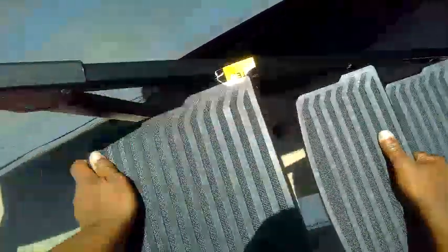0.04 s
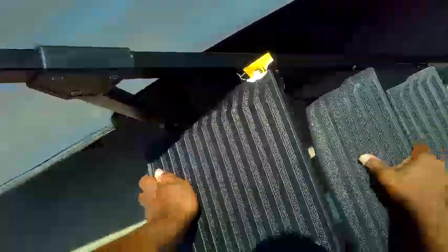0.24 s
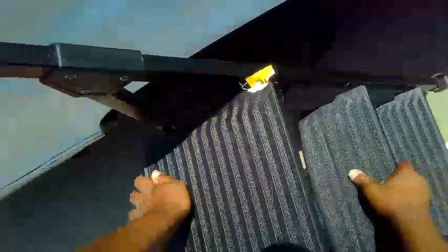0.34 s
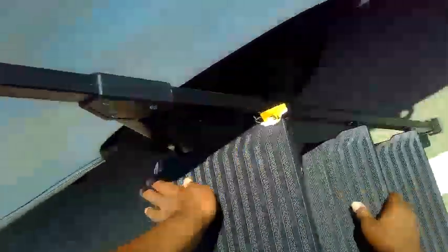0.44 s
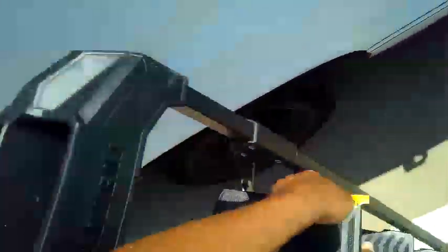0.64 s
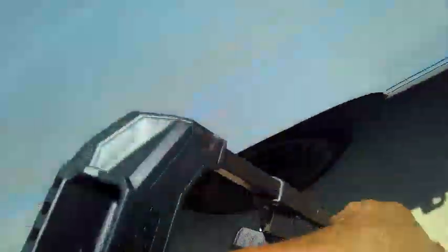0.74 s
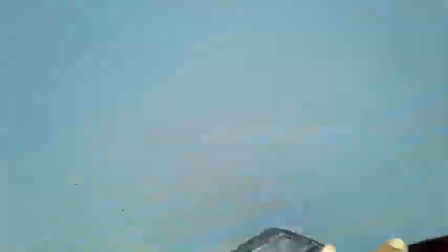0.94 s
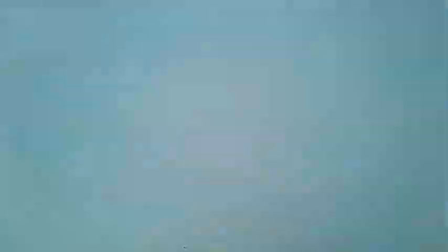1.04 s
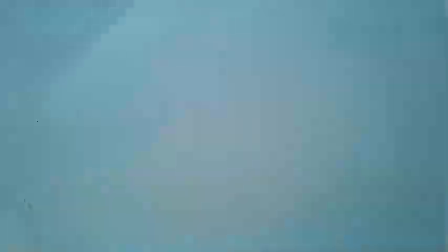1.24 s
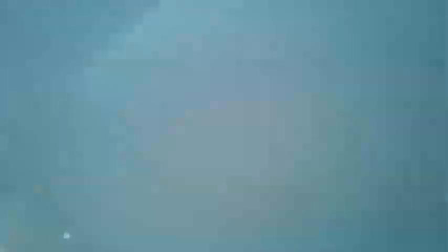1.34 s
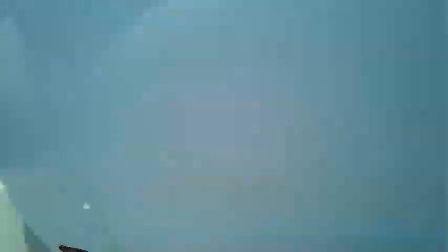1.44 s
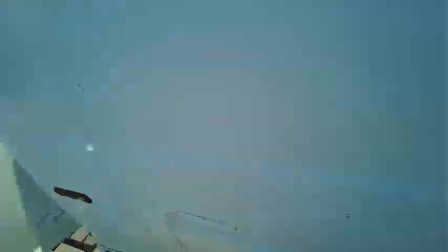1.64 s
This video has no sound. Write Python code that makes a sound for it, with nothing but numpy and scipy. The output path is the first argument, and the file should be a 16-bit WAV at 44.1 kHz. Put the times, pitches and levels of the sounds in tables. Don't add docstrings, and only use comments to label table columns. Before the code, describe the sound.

A metal step ladder snaps open with a loud steel clack, then its feet thud down outdoors

```python
import sys
import numpy as np
from scipy import signal
from scipy.fft import rfft, irfft
from scipy.io import wavfile
from scipy.ndimage import uniform_filter1d, map_coordinates

SR = 44100
rng = np.random.default_rng(int(sys.argv[2]) if len(sys.argv) > 2 else 0)


def volts(x):
    e = np.asarray(x, float) / 20
    return 10 ** e


def output_pcm(signal):
    pcm = np.clip(np.atleast_2d(signal).T, -1, 1) * 32767
    wavfile.write(sys.argv[1], SR, np.round(pcm).astype(np.int16))


N = 74970


def unit(x):
    return x / np.sqrt(np.mean(x ** 2) + 1e-20)


def along(points, hz):
    f, v = np.transpose(points)
    return np.interp(np.log(hz + 1), np.log(f + 1), v)


def curves(rows):
    s, *columns = np.transpose(rows)
    return [np.interp(np.arange(N) / SR, s, column) for column in columns]


def wobble(rate_hz):
    knots = rng.standard_normal(int(N * rate_hz / SR) + 4)
    return map_coordinates(knots, [np.arange(N) * rate_hz / SR])


def spread(pair, alike, hz):
    turn = np.arccos(np.clip(along(alike, hz), -1, 1)) / 2
    mid, side = pair[0] * np.cos(turn), pair[1] * np.sin(turn)
    return np.array([mid + side, mid - side])


def rush(size, spectrum, alike, decay=((1, 1e6),), patchy_db=0.):
    hz, t, z = signal.stft(rng.standard_normal((2, size)), SR, nperseg=256)
    hz = hz[:, None]
    field = uniform_filter1d(rng.standard_normal(z.shape[1:]), size=4, axis=0)
    field = unit(uniform_filter1d(field, size=10, axis=1))
    gain_db = along(spectrum, hz) + patchy_db * field - 60 * t / along(decay, hz)
    z = spread(z, alike, hz) * volts(gain_db)
    return signal.istft(z, SR, nperseg=256)[1][:, :size]


# hz, likeness
NEAR_ALIKE = [(100, 0.79), (500, 1), (1500, 0.12), (4000, .1), (12000, 0.29)]
CONTACT_SPREAD_DB, REBOUND_DB, CHATTER_PER_S = 3, -14, 580


def strikes(rows, modes, colour, decay, noise_db, attack_s, focus_db):
    out, t = np.zeros((2, N + SR)), np.arange(SR // 3) / SR
    for start_s, peak_db, focus_hz, chatter_s in rows:
        def focus(f):
            return -focus_db * np.abs(np.log2(f / focus_hz))

        hz, level_db, t60_s = np.transpose(modes)[:, :, None]
        turn = np.arccos(np.clip(along(NEAR_ALIKE, hz), -1, 1)) * rng.uniform(-1, 1, hz.shape)
        level_db = level_db + focus(hz) + rng.normal(0, 1.5, hz.shape)
        decaying = volts(level_db - 60 * t / t60_s)
        ring = np.array([np.sum(decaying * np.sin(2 * np.pi * hz * t + side * turn), axis=0)
                         for side in (.5, -.5)])

        gap_draw, size_draw = rng.standard_normal((2, 24))
        when_s = np.append(0, np.cumsum(np.exp(.5 * gap_draw) / CHATTER_PER_S))[:-1]
        size = volts((REBOUND_DB + CONTACT_SPREAD_DB * size_draw) * (when_s > 0))
        size = size * np.clip(1 - when_s / chatter_s, 0, 1)
        contacts = np.bincount((when_s * SR).astype(int), size)
        ring = signal.fftconvolve(ring, contacts[None], axes=1)[:, :len(t)]

        focused_colour = [(f, v + .5 * focus(f)) for f, v in colour]
        cloud = rush(len(t), focused_colour, NEAR_ALIKE, decay)
        hit = ring / np.abs(ring).max() + volts(noise_db) * cloud / np.abs(cloud).max()
        out[:, round(start_s * SR):][:, :len(t)] += volts(peak_db) * hit * (1 - np.exp(-t / attack_s))
    return out[:, :N]


# start_s, peak_db, loudest_hz, chatter_s
SNAPS = [
    (0.2454, 8, 900, 0.0017),
    (.2480, 11.5, 1106, 0.0021),
    (.2505, 11.5, 1514, 0.0027),
    (0.2545, 1.5, 2200, 0.0049),
    (.2575, -0.5, 600, 0.0066),
    (.2645, -7.5, 352, 0.0036),
    (.274, -10.5, 1100, 0.013),
    (.284, -23, 1094, 0.0035),
]
# hz, level_db, t60_s
SNAP_MODES = [(225, -5, 0.06), (345, -4, .07), (483, -5, 0.05), (760, -1, .02), (1080, 5, 0.035),
              (1290, 0, .025), (1500, 2, .025), (1790, -2, 0.025), (2200, -1, .03), (2900, -5, 0.02),
              (3700, -10, .02)]
# hz, level_db_per_hz
SNAP_COLOUR = [(35, -47), (60, -5), (752, 3), (948, -6), (1060, -3), (1370, -11.5), (1510, 1),
               (6650, -27.5), (15300, -35.5)]
# hz, t60_s
SNAP_DECAY = [(100, .08), (500, 0.012), (1500, .03), (6000, 0.082), (14000, 0.14)]


def lock_snaps():
    return strikes(SNAPS, SNAP_MODES, SNAP_COLOUR, SNAP_DECAY, noise_db=-4, attack_s=.00015, focus_db=3)


# start_s, peak_db, loudest_hz, chatter_s
CATCH = [
    (0.2056, 6, 864, 0.0043),
    (.2075, 2, 1300, 0.0089),
    (.2100, 0.5, 1840, .002),
    (.2130, 2.5, 2600, 0.0034),
    (.2163, -2, 400, 0.00098),
    (.2255, -17.5, 350, .004),
]
# hz, level_db, t60_s
CATCH_MODES = [(350, -1, .05), (510, -2, .03), (790, 1, .022), (1050, -2, .02), (1300, 3, .02),
               (1760, 3, .017), (2120, -3, .02), (2680, -4, .017), (3400, -10, .013)]
# hz, level_db_per_hz
CATCH_COLOUR = [(35, -42.5), (70, -10.5), (700, -2), (1800, -7), (4000, -19), (5500, -29.5), (10000, -24),
                (15300, -37.5)]
# hz, t60_s
CATCH_DECAY = [(100, .05), (1500, .022), (6000, .028), (14000, .016)]


def hinge_catch():
    return strikes(CATCH, CATCH_MODES, CATCH_COLOUR, CATCH_DECAY, noise_db=-5, attack_s=.0002, focus_db=4)


# hz, t60_s
FRAME_DECAY = [(200, 0.13), (2000, 0.14), (10000, 0.095)]
FRAME_DB, RATTLE_PER_S = -7, 500


def frame(x):
    tail = rush(SR // 4, [(100, -9), (1000, -9.5), (10000, 0.5)], NEAR_ALIKE, FRAME_DECAY)
    tail = tail / np.linalg.norm(tail[0])
    return volts(FRAME_DB) * signal.fftconvolve(x * wobble(RATTLE_PER_S), tail, axes=1)[:, :N]


# hz, level_db, t60_s
TUBE = [(1957, -36, .36), (6920, -25, .07), (7900, -26, .07), (10700, -28, .05)]


def tube():
    t = np.clip(np.arange(N) / SR - SNAPS[0][0], 0, None)
    return sum(volts(level_db - 60 * t / t60_s) * np.sin(2 * np.pi * hz * t + .15 * wobble(20) * (t > 0))
               for hz, level_db, t60_s in TUBE)


# start_s, peak_db, loudest_hz, chatter_s
THUDS = [(.6548, -23.5, 320, 0.0014), (.6565, -31.5, 1280, 0.0022), (.7105, -11, 907, 0.0037),
         (.715, -8, 614, 0.0083), (.7195, -10.5, 704, 0.0033), (.7243, -12.5, 609, 0.0062),
         (.7335, -7, 480, .004), (.7395, -11.5, 540, .003), (.7445, -8.5, 502, .003),
         (.7535, -16, 406, 0.0025), (.762, -21.5, 472, 0.0054), (.7975, -25, 1280, 0.0035),
         (.808, -21, 1490, 0.0095), (.8155, -28, 1030, 0.0046), (.8195, -16.5, 338, 0.006),
         (.8405, -24, 560, 0.0039), (.857, -28, 675, 0.005), (.893, -27, 750, 0.0032),
         (.922, -34, 640, 0.0046), (1.366, -35.5, 170, 0.0027)]
# hz, level_db, t60_s
THUD_MODES = [(175, 2, 0.15), (326, 3.5, 0.06), (516.4, 2.5, 0.044), (750, 2, 0.039), (1024, -4.5, 0.052),
              (1280, 0.5, 0.038), (1880, -6, 0.04)]
# hz, level_db_per_hz
THUD_COLOUR = [(29, -34), (50, -4), (177, 3), (426, -14.5), (511, -12), (1540, -16.5), (5430, -34),
               (6000, -8.5), (7800, -37), (13200, -120)]
# hz, t60_s
THUD_DECAY = [(100, 0.14), (1000, 0.12), (5000, 0.03)]


def thuds():
    return strikes(THUDS, THUD_MODES, THUD_COLOUR, THUD_DECAY, noise_db=-6, attack_s=.001, focus_db=8)


# start_s, peak_db, pitch_hz
PUSHES = [
    (0.294, -25, 102),
    (.322, -29.5, 109.4),
    (0.7067, -16, 97),
    (.734, -23, 151),
    (0.8057, -17.5, 107),
    (1.367, -28, 128.3),
]


def pushes():
    t, out, t60_s = np.arange(N) / SR, 0, 0.059
    for start_s, peak_db, pitch_hz in PUSHES:
        since_s = np.clip(t - start_s, 0, None)
        out = out + volts(peak_db - 60 * since_s / t60_s) * np.sin(2 * np.pi * pitch_hz * since_s)
    return out


# start_s, peak_db, loudest_hz, chatter_s
TAPS = [(.0695, -14, 1330, 0.003), (.078, -14, 1030, 0.003), (.0868, -19, 1150, 0.003),
        (.1300, -19, 1210, 0.008), (.171, -32, 1170, 0.012), (.2368, -7.5, 1120, 0.002),
        (.138, -32, 791, .012), (1.133, -35.5, 702, 0.0031), (1.2015, -31.5, 745, 0.0081),
        (1.2113, -26, 730, 0.006), (1.615, -41, 764, 0.0044), (1.631, -42.5, 794, 0.0081)]
# hz, level_db, t60_s
TAP_MODES = [(775, 1, .045), (1120, -1, .03), (1345, -3, .03), (1710, -5, .025), (2170, -3, .03),
             (2490, -1, .035), (3600, -6, .02)]
# hz, level_db_per_hz
TAP_COLOUR = [(180, -46), (300, -25.5), (1120, -13), (2470, -21), (2670, -32), (3570, -11.5),
              (14000, -51.5)]
# hz, t60_s
TAP_DECAY = [(400, 0.022), (2000, 0.03), (10000, 0.013)]


def tread_taps():
    taps = strikes(TAPS, TAP_MODES, TAP_COLOUR, TAP_DECAY, noise_db=-9, attack_s=.0005, focus_db=11)
    return taps * volts([[1], [-1]])


# start_s, peak_db, pitch_hz, t60_s
TICKS = [(0.5746, -46.5, 3430, 0.0094), (0.5846, -29, 1780, 0.0092), (0.5877, -33.5, 3520, 0.0062),
         (0.7081, -24, 1490, 0.0084), (.7112, -23, 6840, 0.015), (0.7155, -12, 1840, 0.0096),
         (0.7166, -30.5, 7000, 0.013), (0.7199, -28, 6740, .012), (0.7322, -14, 6100, 0.011),
         (0.7338, -20, 10390, 0.013), (0.7356, -14.5, 3800, .012), (0.739, -28, 3060, .01),
         (0.7662, -29.5, 6000, 0.011), (1.214, -52, 3500, .012), (1.2165, -37, 1900, .012),
         (1.134, -41.5, 900, 0.032), (1.135, -51.5, 3000, 0.018), (1.3686, -39.5, 3220, 0.026),
         (1.369, -41, 1310, .02), (1.37, -40, 8100, 0.031)]
TICK_WIDTH_OCTAVES = 0.26


def ticks():
    out, t = np.zeros((2, N + SR)), np.arange(2048) / SR
    hz = np.fft.rfftfreq(len(t), 1 / SR) + 1
    for start_s, peak_db, pitch_hz, t60_s in TICKS:
        band = np.exp(-.5 * (np.log2(hz / pitch_hz) / TICK_WIDTH_OCTAVES) ** 2)
        noise = spread(rfft(rng.standard_normal((2, len(t)))), NEAR_ALIKE, hz)
        crack = unit(irfft(noise * band))
        envelope = volts(peak_db - 3.5 - 60 * t / t60_s) * (1 - np.exp(-t / 0.00022))
        out[:, round(start_s * SR):][:, :len(t)] += envelope * crack
    return out[:, :N]


# start_s, peak_db, rise_s, t60_s, bright_share
SCRAPES = [(0.019, -42.5, 0.07, 0.3, .2), (.565, -42.5, .023, 0.12, 0.23), (0.619, -46, 0.027, 0.43, .3),
           (0.689, -46, 0.017, 0.13, 0.49), (0.706, -26, .006, 0.16, 0.4), (0.731, -23, 0.0027, 0.051, 0.1),
           (.745, -35, 0.014, 0.17, 0.4), (0.776, -46, 0.015, 0.22, 0.75), (.805, -40.5, .012, 0.22, 0.5),
           (1.125, -53.5, .012, .08, .2), (1.193, -44, 0.017, 0.14, 0.5), (1.37, -44, .002, 0.068, 0.5),
           (.14, -45.5, .045, .15, 0.2), (1.38, -55, 0.025, 0.26, 1)]
# hz, level_db_per_hz
RUB = [(200, -28), (600, 0), (1500, 1.5), (3500, -3), (7000, -23.5), (15000, -38.5)]
# hz, level_db_per_hz
GRIT = [(2000, -39.5), (4000, -15), (6300, -7), (10000, -6.5), (15300, -11.5)]


def scrapes():
    t, out = np.arange(N) / SR, 0
    grain = volts(2 * wobble(350))
    rub = unit(grain * rush(N, RUB, NEAR_ALIKE, patchy_db=1)) * volts([[1.5], [-1.5]])
    grit = unit(grain * rush(N, GRIT, NEAR_ALIKE, patchy_db=1))
    for start_s, peak_db, rise_s, t60_s, bright in SCRAPES:
        rise = np.clip((t - start_s) / rise_s, 0, 1) ** 2
        fall = volts(peak_db - 60 * np.clip(t - start_s - rise_s, 0, None) / t60_s)
        out = out + rise * fall * (bright * grit + (1 - bright) * rub)
    return out


# time_s, firing_hz, level_db
HUM = [(0, 80, -48.5), (.3, 74, -42), (.6, 76.9, -67), (.9, 76.56, -38.5), (1.3, 72.85, -42),
       (1.7, 74.24, -36)]


def engine_hum():
    pitch_hz, hum_db = curves(HUM)
    phase = 2 * np.pi * np.cumsum(pitch_hz) / SR + .5 * wobble(9.1)
    level = np.sqrt(2) * volts(hum_db - 5.5 + 2.5 * wobble(78))
    second = volts(-15 + 0.72 * wobble(36)) * np.sin(2 * phase)
    return level * (np.sin(phase) + second) * volts([[-2.2], [1.8]])


# time_s, level_db
AIR = [(0, 4), (.3, 0.5), (.45, 2), (1.0, 0), (1.3, 1.5), (1.7, -1.5)]
# hz, level_db_per_hz
CITY = [(12, -43.5), (20, -11.5), (80, -10), (224, -22), (350, -27.5), (517, -34), (784, -32.5),
        (1800, -41), (15300, -56)]
# hz, likeness
FAR_ALIKE = [(60, 0.49), (240, 0.84), (940, 0.2), (3750, 0.029), (14900, 0.05)]
# hz, balance_db
FAR_BALANCE = [(60, -3.5), (240, -4), (940, -8.5), (3750, -0.5), (14900, 3)]
CITY_DB = -43.5


def city_rumble():
    air_db, = curves(AIR)
    hz = np.fft.rfftfreq(N, 1 / SR)
    pair = spread(rfft(rng.standard_normal((2, N))), FAR_ALIKE, hz)
    pair = pair * volts(along(CITY, hz) + np.array([[.5], [-.5]]) * along(FAR_BALANCE, hz))
    return volts(CITY_DB + air_db) * volts(.8 * wobble(9)) * unit(irfft(pair, N))


# hz, balance_db
NEAR_BALANCE = [(60, -4.5), (700, -7), (2370, -4.5), (4370, 2), (8060, 11.5), (14900, -1)]


def scene():
    snaps = lock_snaps() + hinge_catch()
    near = snaps + frame(snaps) + tube() + thuds() + pushes() + tread_taps() + ticks()
    lean = volts(np.array([[.5], [-.5]]) * along(NEAR_BALANCE, np.fft.rfftfreq(N, 1 / SR)))
    return irfft(rfft(near) * lean, N) + scrapes() + engine_hum() + city_rumble()


def top_cut(x):
    return signal.sosfilt(signal.butter(12, 15480, fs=SR, output="sos"), x)


CLIP_TOP, CLIP_HARD, TOP_HZ = 1, 10, 15600


def record(dry):
    x = dry / (1 + np.abs(dry / CLIP_TOP) ** CLIP_HARD) ** (1 / CLIP_HARD)
    band = np.where(np.fft.rfftfreq(N, 1 / SR) < TOP_HZ, 1, volts(-38.5))
    x = irfft(rfft(x) * band, N)
    return top_cut(x)


dry = scene()
out = record(dry)
output_pcm(out)
```